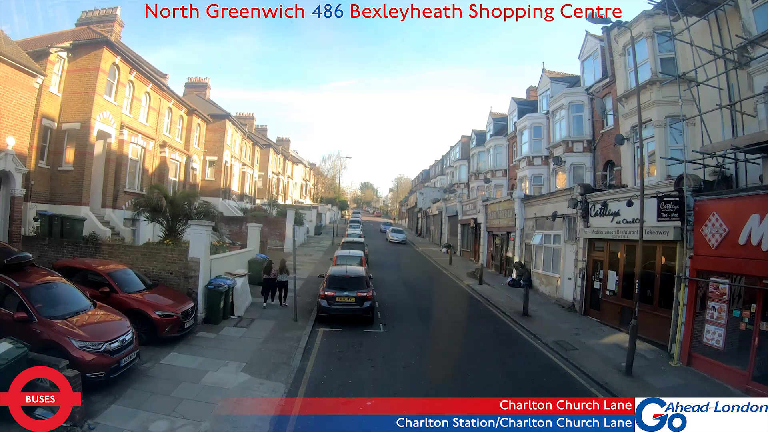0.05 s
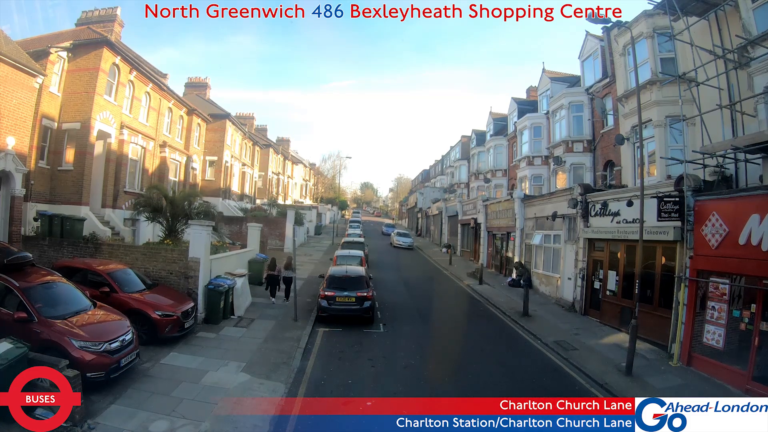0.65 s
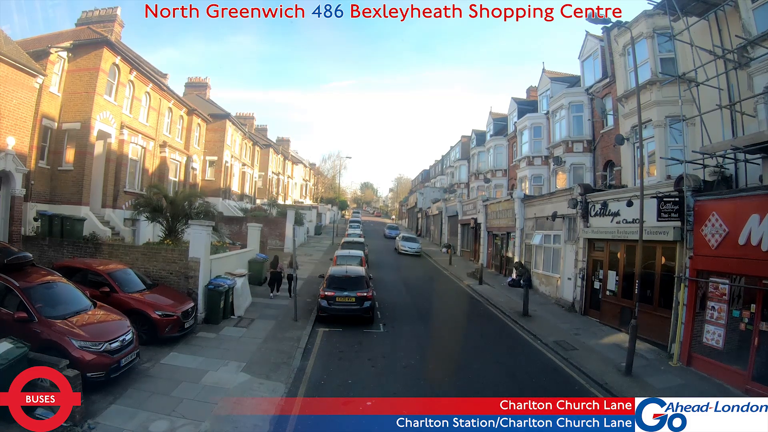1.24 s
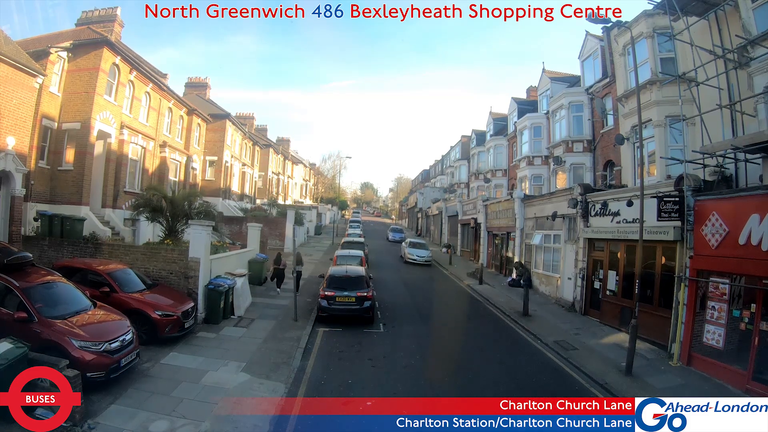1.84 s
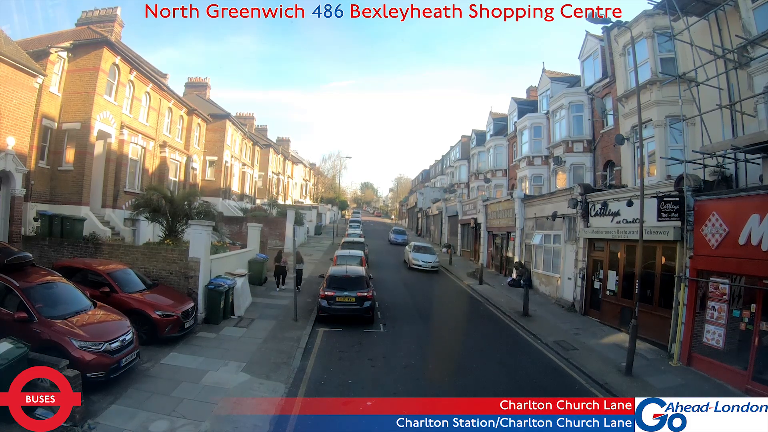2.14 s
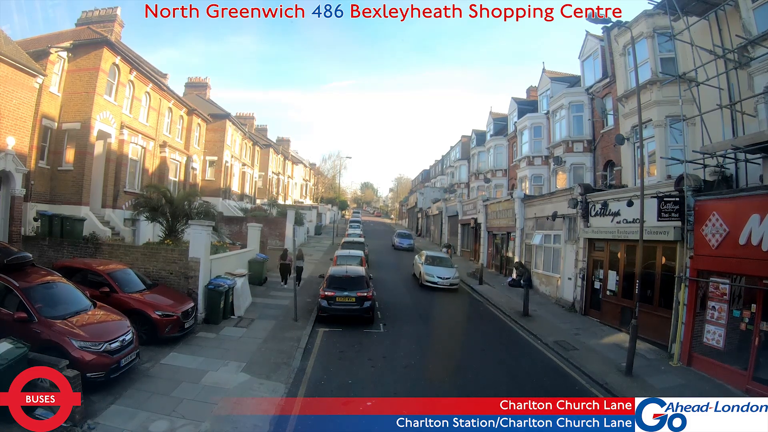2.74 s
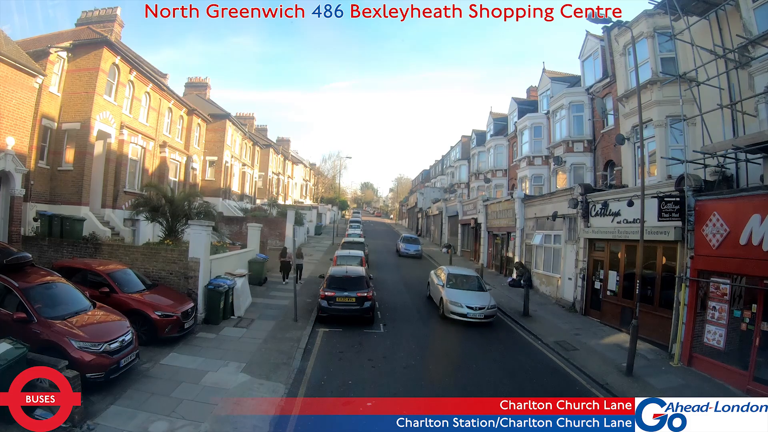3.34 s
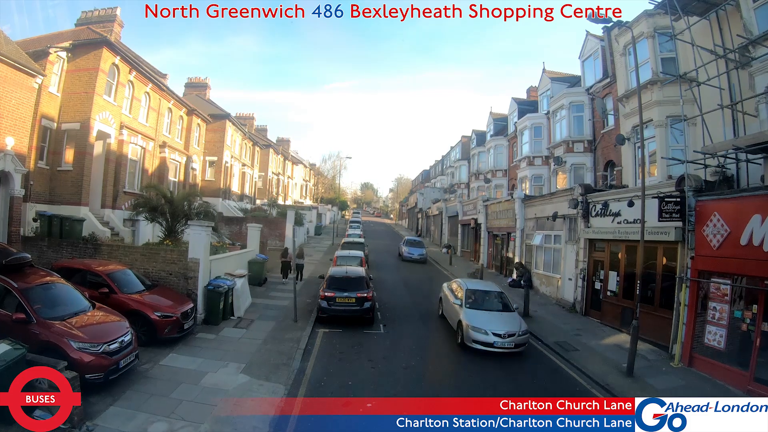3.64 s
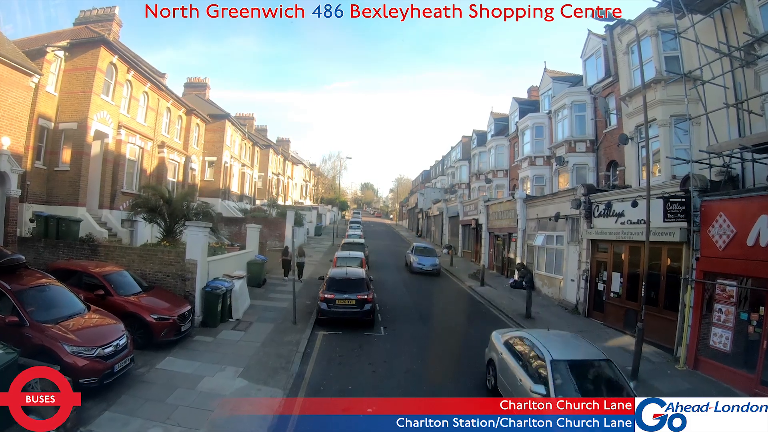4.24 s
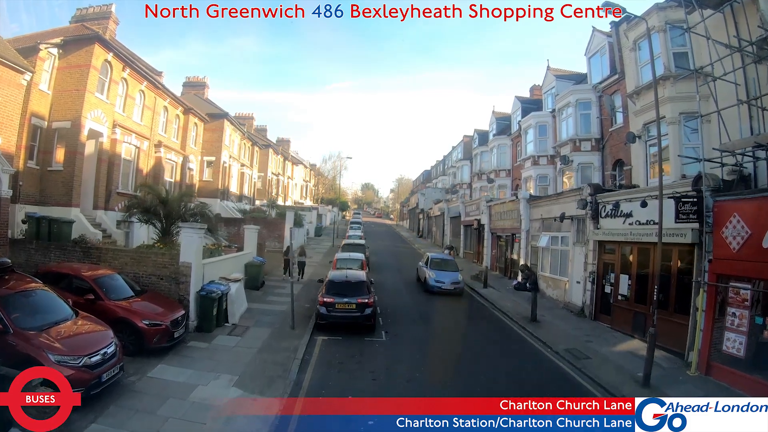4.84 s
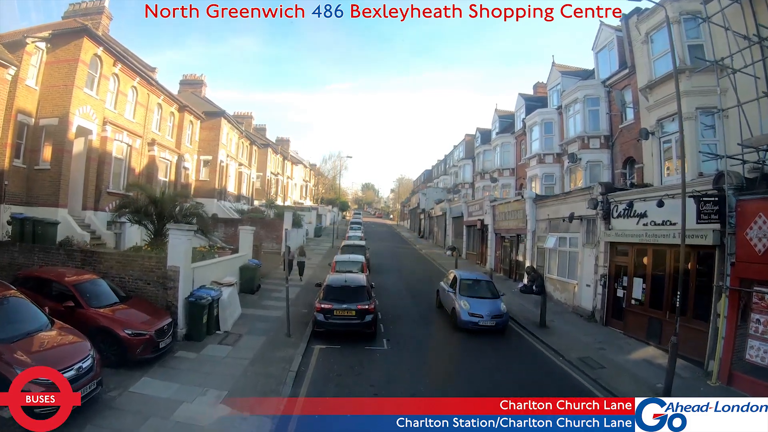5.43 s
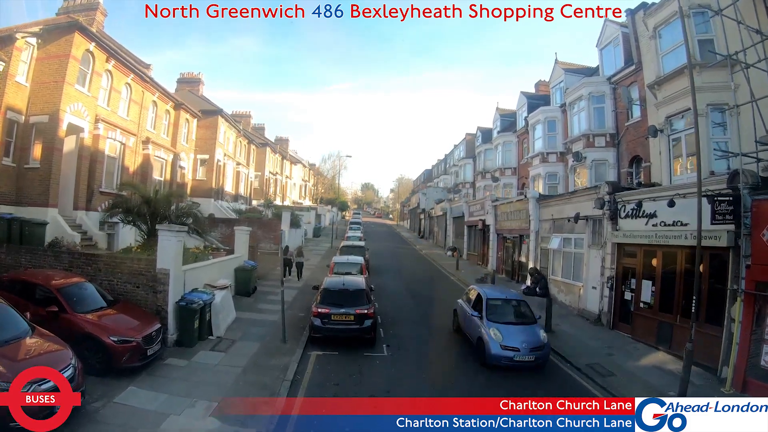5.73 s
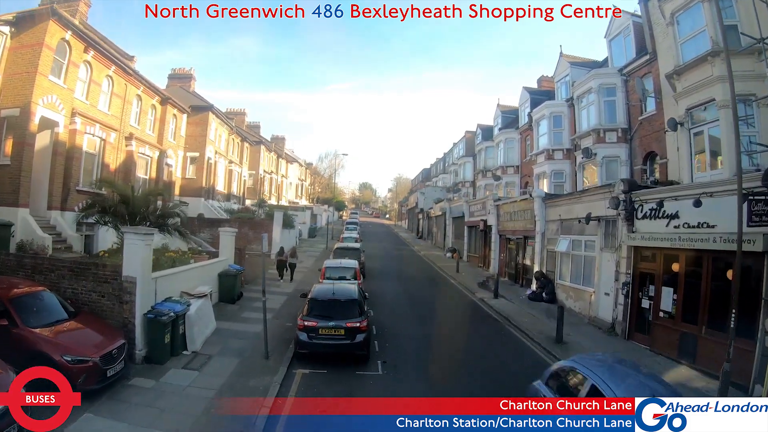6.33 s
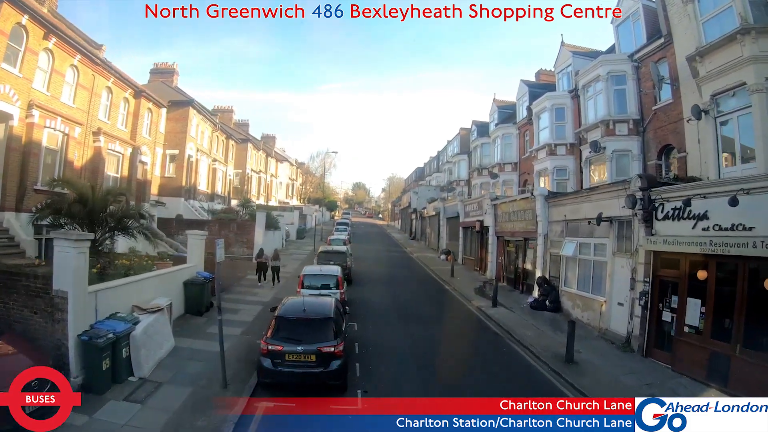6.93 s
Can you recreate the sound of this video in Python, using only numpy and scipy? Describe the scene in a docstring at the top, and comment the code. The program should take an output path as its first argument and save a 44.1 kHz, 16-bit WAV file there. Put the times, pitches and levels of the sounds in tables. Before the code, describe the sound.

Inside a double-decker bus, a booming diesel idles, then revs up and moves off, with a short high squeal and a panel rattle.

```python
"""Riding a double-decker bus

The six-cylinder diesel idles with a deep boom, ticking injectors and an air compressor that soon stops.
The bus pulls away and eases off: gears whine, and low notes swell and fade as they cross the cabin's
standing waves (pitches that are loud or weak at this seat). Two cars pass, the whine flares briefly,
a brake squeals, a valve puffs out air and a loose panel rattles."""
import sys
import numpy as np
from scipy import signal
from scipy.fft import rfft, irfft, next_fast_len
from scipy.io import wavfile
from scipy.ndimage import map_coordinates

SR = 44100
rng = np.random.default_rng(int(sys.argv[2]) if len(sys.argv) > 2 else 0)


def to_wav(s):
    """Save 16-bit WAV."""
    ch = np.atleast_2d(s).T  # columns
    pcm = np.round(np.clip(ch, -1, 1) * 32767)  # PCM
    wavfile.write(sys.argv[1], SR, pcm.astype(np.int16))


N = 307818
T = np.arange(N) / SR

# Engine speed, as cylinder firings per second: time_s, firing_hz
ENGINE_SPEED = [(0, 35.05), (1.6, 34.9), (2.0, 32.4), (2.4, 33.5), (3.45, 34.2), (3.57, 40), (3.76, 42),
                (3.87, 44.4), (3.94, 46.7), (4.1, 48), (4.45, 48.6), (4.6, 52.6), (4.78, 56.6), (5.0, 57.6),
                (5.2, 56.3), (5.4, 56.4), (5.7, 59), (6.0, 60.1), (6.3, 63.6), (6.5, 64.7), (6.6, 62.2),
                (6.72, 55.4), (6.85, 53.8), (6.98, 54.5)]
# The boom at the seat, sinking in the quiet spots of the standing waves: time_s, level_db
BOOM_LEVEL = [(0, -19), (.77, -20), (.97, -14.5), (1.69, -16.5), (1.88, -14), (2.25, -15), (2.65, -14),
              (3.47, -14.5), (3.57, -24), (3.66, -20.5), (3.74, -40.5), (3.85, -30), (3.9, -20),
              (4.35, -20.5), (4.55, -14.5), (4.82, -24), (4.93, -40), (5.08, -25), (5.5, -38), (5.8, -25.5),
              (6.12, -18.5), (6.5, -20), (6.63, -28), (6.73, -18), (6.98, -17)]
# Standing waves that lift or sink the exhaust drone: pitch_hz, width_hz, gain_db
CABIN_WAVES = [(53.2, 6, 1.5), (59, 6.5, -6), (84.02, 8.6, 11.5), (97, 1.7, -8)]
# Speeds where idle ends, pulling away starts and ends, load starts and ends, top speed starts: firing_hz
STAGE_SPEEDS = [36, 42.5, 50, 56, 60, 63.5]
# Tones that shake the floor: times_cycle_rate, idle_db, pulling_db, loaded_db, top_speed_db
FLOOR_TONES = [(2, -20.5, -8, -6.5, 0.5), (3, -15, -5.5, 3, -1), (4, -13, -8, -6, -6),
               (5, -9.5, -2.5, -8, -7), (7, -17, -5.5, -2, -2.5), (8, -17, -11.5, -14, -12.5),
               (10, -11.5, -7.5, -0.5, -14.5), (11, -18, -6, -3.5, -15.5), (12, -8.5, 3, 3, -1),
               (14, -11, -9.5, -17.5, -20.5), (15, -7.5, -14, -17.5, -12), (16, -13, -11, -10, -4),
               (18, -8, -3.5, -9, -10), (19, -19.5, -12, -8.5, -27), (21, -16.5, -6.5, -8, -14.5)]
# Panel hum from shafts and belts: times_firing_rate, idle_db, pulling_db, loaded_db, top_speed_db
HUM_TONES = [(4, -4, -3.5, -1.5, -1.5), (4.23, -9, -0.5, -7.5, -5.5), (4.67, -11, -10.5, -2.5, -12.5),
             (5.18, -4, -2.5, -13.5, -24), (6, -7.5, -17, -26.5, -38.5), (6.83, -19.5, -22, -19.5, -35)]
# Speeds at which the panels shake more or less: firing_hz, width_hz, gain_db
PANEL_SHAKE = [(47.28, 6.3, 3), (53.53, 5.7, -4), (59.78, 1.9, 3.5)]
# Gear and alternator whine: times_firing_rate, idle_db, pulling_db, loaded_db, top_speed_db
WHINE_TONES = [(8.481, -23.5, -18, -15, -7.5), (12.6, -29.5, -12.5, -19, -17),
               (16.61, -32.5, -20, -23, -20), (17.068, -34.5, -14.5, -21, -15.5),
               (21.11, -21.5, -33, -20.5, -21), (31.42, -38, -33.5, -36, -18),
               (48.46, -41, -28.5, -24, -38), (52.38, -40, -36, -35, -43), (62.14, -38, -38, -37, -40),
               (82.37, -43.5, -30, -43, -47), (103.6, -50, -45, -41, -48), (111.5, -50, -47, -41, -49.5)]
# Resonances that boost a tone as it slides past: pitch_hz, width_hz, gain_db
TONE_BOOSTS = [(87.22, 8.1, 9.5), (181.7, 20, 4.5), (282.1, 12, 3), (383.9, 19, 10.5), (493.4, 22, 7.5),
               (555, 39, 4), (745, 18, 9.5), (1095.8, 37, 8), (3020, 110, 10), (3520, 77, 11.5),
               (3955, 110, 8.5), (6090, 160, 7), (6340, 90, 6)]
# How loud each layer is: idle_db, speed_doubling_db, compressor_db, run_down_s, lift_off_db
DRONE_RULE = (-47.5, 25.5, 2.5, 2, -2)
SHAKE_RULE = (-41, 10, 2, 0.26, -3.5)
HUM_RULE = (-44, 16, 4, 0.01, 6)
RUMBLE_RULE = (-39, 10, 4.5, 0.37, 0)
ROAR_RULE = (-49, 16.5, 5.5, 0.6369, -1.5)
HISS_RULE = (-57.5, 12, 4, 0.62, -2)
# Tone colour of the engine's rumble, roar and hiss: pitch_hz, level_db
RUMBLE_COLOUR = [(15, -12.5), (26, -4), (50, 1), (90, -1), (130, -1.5), (190, 0), (270, -6), (340, -15),
                 (480, -28.5), (900, -81)]
IDLE_ROAR = [(180, -25), (300, -3), (370, -3), (398, -10.5), (429, -5.5), (467, -7), (744, -7.5),
             (858, -12.5), (1070, -11.5), (2200, -21.5), (2860, -53), (4840, -120)]
LOADED_ROAR = [(180, -22.5), (300, 1.5), (329, -11.5), (376, -5.5), (440, -11.5), (533, -6.5), (580, -9),
               (744, -8), (879, -15), (1080, -12), (1330, -14.5), (1710, -15.5), (2200, -23), (2860, -44),
               (4840, -120)]
IDLE_HISS = [(1060, -18), (1800, -7), (2000, -10), (2590, -7.5), (2880, -8), (3270, -11.5), (4970, -18),
             (6140, -24), (7880, -25.5), (10100, -34), (11000, -45.5), (14300, -70.5), (22000, -120)]
LOADED_HISS = [(1060, -30), (1800, -7.5), (2460, -8.5), (3010, -10), (3480, -12.5), (3700, -16.5),
               (4170, -14), (4820, -21.5), (6190, -22.5), (8440, -28.5), (9670, -29), (10200, -31),
               (11000, -50.5), (14300, -71.5), (22000, -120)]
# Cabin panels and fittings that colour the noise: pitch_hz, width_hz, gain_db
FITTINGS = [(564, 35, -1), (644.6, 21, 4), (741, 22, 3), (807.7, 20, 2.5), (939, 24, 6.5), (1097, 31, 3.5),
            (1194.5, 31, 3.5), (1603, 25, 3), (1731, 19, 3.5), (1876.5, 20, 4), (2190, 45, -2),
            (2986, 100, 1), (3487, 70, 2.5), (6150, 230, -0.5)]
# How alike the noise is in both ears (1 is the same): pitch_hz, likeness
EAR_LIKENESS = [(30, .9), (60, 0.853), (120, 0.939), (190, 1), (310, 0.954), (420, 0.858), (560, 0.845),
                (800, 0.33), (1400, 0.29), (2600, 0.55), (4000, 0.57), (5500, 0.23), (9000, .1)]
# How much louder the left side is than the right: pitch_hz, difference_db
BALANCE = [(30, -.7), (120, -.3), (270, -1), (410, 1), (540, .2), (640, -.5), (730, -4.5), (820, -3),
           (930, 1), (1150, 1), (1500, -.5), (1950, -3), (2600, -4), (3500, -3), (5000, -1.2), (7000, -.6),
           (9500, 0)]
# Strength of the injector ticks: time_s, level_db
TICK_LEVEL = [(0, -81.5), (1.7, -76.5), (2.1, -71.5), (2.8, -65.5), (3.4, -68), (3.62, -85), (7, -68)]
# Tone colour of the ticks: pitch_hz, level_db
TICK_COLOUR = [(2500, -29.5), (4000, -7.0), (4760, -3.5), (4823, 6), (4890, -2.5), (5700, -8.5),
               (7000, -15.5), (10000, -17.5), (11000, -28)]
# Tones of the compressor's strokes: times_cycle_rate, level_db
PUMP_TONES = [(4, -43.5), (12, -35), (14, -46.5), (16, -38), (20, -48.5)]
# Oncoming cars: closest_s, half_power_after_s, level_db
PASSING_CARS = [(4.9, 0.19, -50), (6.48, 0.12, -46)]
# Brief high flares of the whine: start_s, length_s, start_hz, end_hz, level_db
WHINE_FLARES = [(4.795, .09, 2955, 2995, -49), (5.055, .07, 3000, 2970, -51),
                (5.11, .12, 3510, 3535, -53.5), (5.63, .13, 3010, 3035, -52), (6.33, .1, 2970, 3000, -50)]
# Brake squeals: start_s, length_s, start_hz, end_hz, level_db
BRAKE_SQUEALS = [(5.372, .025, 8720, 8860, -53), (5.403, .028, 8900, 8940, -53),
                 (5.617, .05, 7900, 7740, -36.5), (5.66, .085, 7780, 7930, -38),
                 (5.715, .09, 7930, 7900, -47), (5.78, .08, 7920, 7900, -60), (6.06, .06, 7900, 8060, -65),
                 (6.28, .05, 7200, 7300, -58)]
# Tone colour of escaping air: pitch_hz, level_db
AIR_COLOUR = [(2000, -41.5), (5000, -6), (8500, 2), (11000, 2), (13000, -10.5)]
# Knocks of the loose panel: start_s, level_db
PANEL_KNOCKS = [(6.747, -45), (6.758, -37.5), (6.774, -34.5), (6.793, -43)]
# Notes that the loose panel rings with: pitch_hz, level_db, ring_s
PANEL_NOTES = [(1752, -8, 0.042), (2240, 1.5, .028), (2410, 0, .03), (2535, 0.5, 0.031), (3320, -11.5, .03),
               (4510, -14, .02)]

CYLINDERS = 6  # each fires once per engine cycle
PULL_HZ, LOAD_LAG_S = 37.27, .07  # above this firing rate levels rise, a little late
BRIGHT_FROM_HZ, BRIGHT_SPAN_HZ = 42.58, 12.4  # firing rates over which the noise turns brighter
COMPRESSOR_OFF_S, UNLOAD_S = 0.822, 0.22  # when the compressor lets go, and how long it takes
LIFT_S, LIFT_FALL_S = 6.79, 0.043  # when the driver lifts off, and how fast the load goes


def amp(db):
    """Turn decibels into a gain to multiply by."""
    return 10 ** (np.asarray(db) / 20)


def along(points, hz):
    """Read a table's value at any pitch, on a musical (log) scale."""
    pitches, values = np.transpose(points)
    return np.interp(np.log(hz + 1), np.log(pitches + 1), values)


def over_time(points):
    """Join timed points with straight lines, one value per sample."""
    return np.interp(T, *np.transpose(points))


def wobble(rate):
    """A smooth random curve through `rate` points a second."""
    knots = rng.standard_normal(int(N * rate / SR) + 4)
    coarse = np.linspace(0, T[-1], 3000)
    return np.interp(T, coarse, map_coordinates(knots, [coarse * rate]))


def filtered(x, response):
    """Turn each pitch in x up or down by the gain response(hz)."""
    size = next_fast_len(N + SR // 4)
    return irfft(rfft(x, size) * response(np.fft.rfftfreq(size, 1 / SR)), size)[..., :N]


def swell(resonances, hz):
    """Decibels gained or lost near each resonance."""
    return sum(db / (1 + (2 * (hz - centre) / width) ** 2) for centre, width, db in resonances)


def rush(colour):
    """Stereo noise from all around, coloured by the cabin's fittings."""
    def response(hz):
        spread = np.arccos(np.clip(along(EAR_LIKENESS, hz), -1, 1)) / 2
        return amp(along(colour, hz) + swell(FITTINGS, hz)) * [np.cos(spread), np.sin(spread)]
    mid, side = filtered(rng.standard_normal((2, N)), response)
    return np.array([mid + side, mid - side]) / np.std(mid)


def cabin_echo(x, ring_s, wet):
    """Add the cabin's short echo, different in each ear; it falls 60 dB in ring_s."""
    t = T[:SR // 2]
    tail = rng.standard_normal((2, len(t))) * amp(-60 * t / ring_s)
    echo = signal.fftconvolve(x[None], tail / np.linalg.norm(tail[0]), axes=1)[:, :N]
    return (x + wet * echo) / np.hypot(1, wet)


def level(rule, firing_hz):
    """A layer's decibels: up with speed, shifting as the compressor stops or the driver lifts off."""
    idle_db, doubling_db, compressor_db, run_down_s, lift_db = rule
    trailing_hz = np.interp(T - LOAD_LAG_S, T, firing_hz)
    doublings = np.log2(np.maximum(trailing_hz / PULL_HZ, 1))
    pumping = np.exp(-np.maximum(T - COMPRESSOR_OFF_S, 0) / run_down_s)
    lifted = np.clip((T - LIFT_S) / LIFT_FALL_S, 0, 1)
    return idle_db + doubling_db * doublings + compressor_db * pumping + lift_db * lifted


def shaft_tone(turns, flutter_db, drift):
    """A tone tied to a turning shaft, wavering a little in strength and timing."""
    strength = np.sqrt(2) * amp(flutter_db * wobble(13))
    return strength * np.sin(2 * np.pi * (turns + rng.random()) + drift * wobble(9))


def tone_stack(table, turns, turn_hz, firing_hz, flutter_db, drift):
    """Tones at multiples of a turning rate; engine speed and resonances set how loud each is."""
    out, coarse = np.zeros(N), slice(None, None, 64)
    for multiple, *levels in table:
        stage_db = np.interp(firing_hz[coarse], STAGE_SPEEDS, np.repeat(levels, 2)[1:-1])
        gain = amp(stage_db + swell(TONE_BOOSTS, multiple * turn_hz[coarse]))
        out += np.interp(T, T[coarse], gain) * shaft_tone(multiple * turns, flutter_db, drift)
    return out


def engine_tones(firings, firing_hz):
    """The firings boom, the exhaust drones, uneven cylinders shake the floor and the panels hum."""
    boom = amp(over_time(BOOM_LEVEL)) * shaft_tone(firings, flutter_db=0.41, drift=.012)
    drone_db = level(DRONE_RULE, firing_hz) + swell(CABIN_WAVES, 1.5 * firing_hz)
    drone = amp(drone_db) * shaft_tone(1.5 * firings, flutter_db=0.47, drift=.04)
    cycles, cycle_hz = firings / CYLINDERS, firing_hz / CYLINDERS
    floor = tone_stack(FLOOR_TONES, cycles, cycle_hz, firing_hz, flutter_db=1.1, drift=.1)
    hum_db = level(HUM_RULE, firing_hz) + swell(PANEL_SHAKE, firing_hz)
    hum = tone_stack(HUM_TONES, firings, firing_hz, firing_hz, flutter_db=.9, drift=.06)
    return boom + drone + amp(level(SHAKE_RULE, firing_hz)) * floor + amp(hum_db) * hum


def whine(firing_hz, freewheel_s=.08):
    """Gears and alternator whine higher with speed, and spin on for a moment when it drops."""
    spin_hz = np.maximum(firing_hz, np.interp(T - freewheel_s, T, firing_hz))
    turns = np.cumsum(spin_hz) / SR + .0008 * wobble(60)
    tones = tone_stack(WHINE_TONES, turns, spin_hz, spin_hz, flutter_db=2.2, drift=.3)
    return amp(level(ROAR_RULE, spin_hz) + 0.5) * tones


def engine_noise(firings, firing_hz):
    """Rumble surges once a cycle; the roar of burning fuel and the hiss throb with the firings."""
    load = np.clip((firing_hz - BRIGHT_FROM_HZ) / BRIGHT_SPAN_HZ, 0, 1)
    def blend(idle, loaded):
        return np.sqrt(1 - load) * rush(idle) + np.sqrt(load) * rush(loaded)
    rumble = amp(level(RUMBLE_RULE, firing_hz) - 0.18) * rush(RUMBLE_COLOUR)
    roar = amp(level(ROAR_RULE, firing_hz) + 1.7031) * blend(IDLE_ROAR, LOADED_ROAR)
    hiss = amp(level(HISS_RULE, firing_hz) - 0.22) * blend(IDLE_HISS, LOADED_HISS)
    chug = 1 + .3 * np.cos(2 * np.pi * firings / CYLINDERS)
    throb = 0.083 * np.cos(2 * np.pi * firings) + 0.06 * np.cos(2 * np.pi * 3 * firings)
    return chug * rumble + (1 + throb) * roar + (1 + 0.44 * throb) * hiss


def injectors(firings, firing_hz):
    """One soft, bright tick per firing rings a small fitting near 4.8 kHz."""
    since_s = firings % 1 / firing_hz
    ticks = np.exp(-since_s / .012) * (1 - np.exp(-since_s / .003))
    ticks /= np.sqrt(np.mean(ticks ** 2))
    from_left = amp([[2], [-2]])
    return amp(over_time(TICK_LEVEL)) * ticks * rush(TICK_COLOUR) * from_left


def compressor(firings):
    """The engine drives an air pump, which thuds along until it lets go."""
    running = np.clip((COMPRESSOR_OFF_S + UNLOAD_S - T) / UNLOAD_S, 0, 1)
    cycles = firings / CYLINDERS
    return running * sum(amp(db) * shaft_tone(multiple * cycles, flutter_db=2.52, drift=0.086)
                         for multiple, db in PUMP_TONES)


def cars():
    """Each car's tyre noise swells and fades: twice as far away is half as strong."""
    power = sum(amp(db) ** 2 / (1 + ((T - closest_s) / near_s) ** 2)
                for closest_s, near_s, db in PASSING_CARS)
    return np.sqrt(power) * rush(LOADED_HISS)


def short_tones(table, flutter_hz):
    """Short tones that swell and fade while their pitch slides and flutters."""
    out, flutter = np.zeros(N), flutter_hz * wobble(190)
    for start_s, length_s, start_hz, end_hz, db in table:
        progress = np.clip((T - start_s) / length_s, 0, 1)
        hz = start_hz + (end_hz - start_hz) * progress + flutter
        out += amp(db) * np.sin(np.pi * progress) * np.sin(2 * np.pi * np.cumsum(hz) / SR)
    return out


def whine_flares():
    """Brief, faint high tones near 3 and 3.5 kHz, as the whine crosses cabin resonances."""
    return cabin_echo(short_tones(WHINE_FLARES, flutter_hz=25), ring_s=.15, wet=.9)


def brake():
    """The brake pad catches and slips, and its squeal rings briefly in the cabin."""
    return cabin_echo(short_tones(BRAKE_SQUEALS, flutter_hz=90), ring_s=.17, wet=1.4)


def air_valve(start_s=5.995, rise_s=.008, fade_s=.04):
    """A valve lets out a soft puff of compressed air."""
    t = np.maximum(T - start_s, 0)
    return amp(-56) * (1 - np.exp(-t / rise_s)) * np.exp(-t / fade_s) * rush(AIR_COLOUR)


def rattle():
    """A loose panel knocks and rings as the engine eases off."""
    out, t = np.zeros(N + SR), T[:SR // 5]
    for start_s, db in PANEL_KNOCKS:
        ring = sum(amp(note_db + rng.normal(0, 2.6) - 60 * t / ring_s) * np.sin(2 * np.pi * hz * t)
                   for hz, note_db, ring_s in PANEL_NOTES)
        crack = 1.7 * amp(-60 * t / 0.024) * rng.standard_normal(len(t))
        out[round(start_s * SR):][:len(t)] += amp(db) * (ring + crack)
    dull = filtered(out[:N], lambda hz: 1 / np.sqrt(1 + (hz / 3200) ** 4))  # a padded contact
    return cabin_echo(dull, ring_s=0.11, wet=1.0)


def scene():
    """The engine and the sounds around it, all heard from one seat."""
    firing_hz = over_time(ENGINE_SPEED)
    firings = np.cumsum(firing_hz) / SR  # how many firings so far
    mix = engine_tones(firings, firing_hz) + whine(firing_hz) + engine_noise(firings, firing_hz)
    mix += injectors(firings, firing_hz) + compressor(firings)
    mix += cars() + whine_flares() + brake() + air_valve() + rattle()
    return filtered(mix, lambda hz: amp(np.outer([.5, -.5], along(BALANCE, hz))))


def record(dry):
    """The highest treble falls away steeply, and the sound fades in and out over 6 milliseconds."""
    from_edge_s = np.minimum(T, T[-1] - T)
    fade = np.sin(np.pi / 2 * np.clip(from_edge_s / .006, 0, 1)) ** 2
    return filtered(dry * fade, lambda hz: (hz < 14200) / np.sqrt(1 + (hz / 11200) ** 40))


dry = scene()
out = record(dry)
to_wav(out)
```